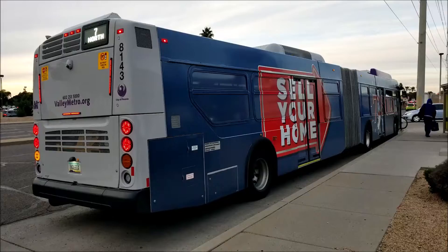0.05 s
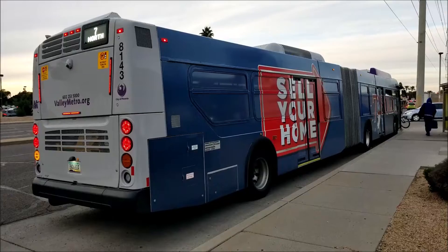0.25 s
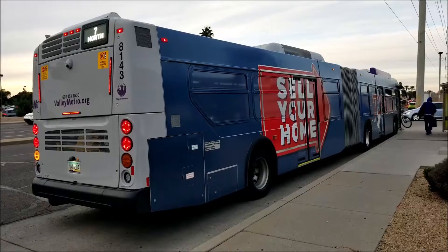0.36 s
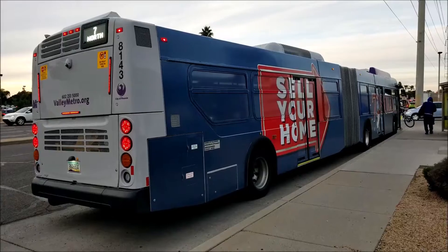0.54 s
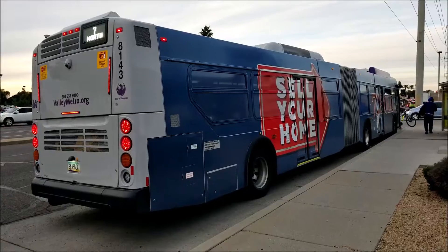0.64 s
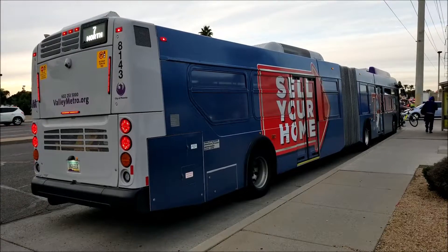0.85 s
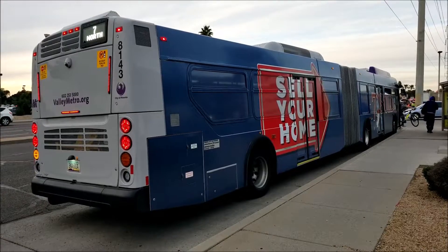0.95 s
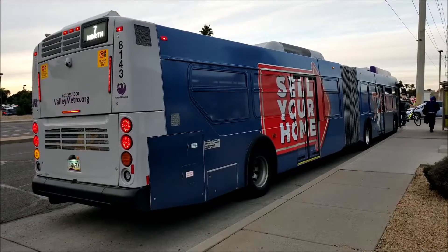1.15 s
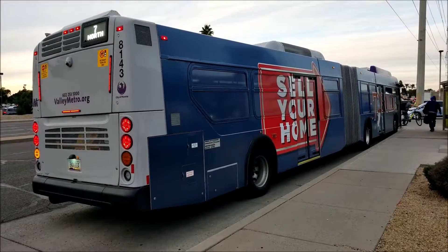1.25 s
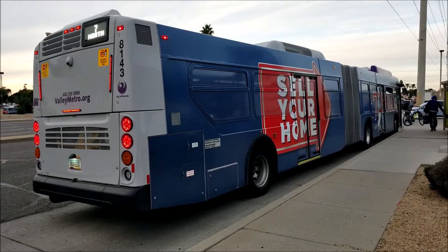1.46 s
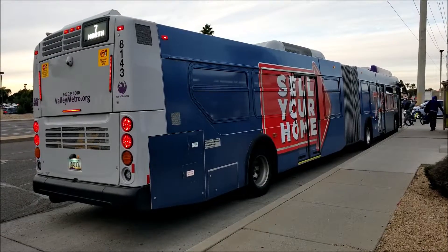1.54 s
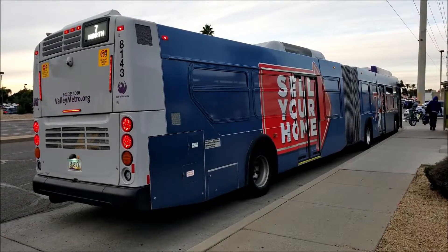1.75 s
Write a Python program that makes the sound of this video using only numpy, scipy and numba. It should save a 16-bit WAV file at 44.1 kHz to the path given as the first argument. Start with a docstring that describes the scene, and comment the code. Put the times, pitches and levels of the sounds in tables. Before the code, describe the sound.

Loud air brake hiss bursts from an idling bus and dies away, with faint traffic behind.

```python
"""A bus's air brake spits once, then lets out its air: a bright, slightly crackling jet
that dies away as the pressure falls. The bus idles at the kerb, heard from behind its
diesel engine, which knocks, hisses and hums, with traffic beyond. The microphone's automatic
volume control turns everything down under the blast and recovers slowly."""
import sys
import numpy as np
from scipy.fft import rfft, irfft
from scipy.io import wavfile
from scipy.ndimage import uniform_filter1d
from numba import njit

SR = 44100
rng = np.random.default_rng(int(sys.argv[2]) if len(sys.argv) > 2 else 0)


def digitize_waveform(pressure):
    """Quantize a signal to 16-bit integers and store it at the path in sys.argv[1].

    Rows of a 2-D input are taken as channels; values are limited to [-1, 1].
    """
    field = np.atleast_2d(pressure).T
    bounded = np.clip(field, -1, 1)
    quanta = np.round(bounded * 32767).astype(np.int16)
    wavfile.write(sys.argv[1], SR, quanta)


N = 79380
FIRING_HZ = 34.82  # cylinder firings each second
TOP_HZ = 15800  # the highest pitch let through


def undb(db):
    """Turn decibels into a number to multiply by."""
    return 10 ** (np.asarray(db) / 20)


def unit(x):
    """Scale a signal to an average strength (rms) of 1."""
    return x / np.sqrt(np.mean(x ** 2))


def clock():
    """The time of each sample, in seconds."""
    return np.arange(N) / SR


def pitches():
    """The pitch of each slot in the spectrum, in Hz."""
    return np.maximum(np.arange(N // 2 + 1) * SR / N, 1)


def colour(points):
    """Join (pitch_hz, level_db) points into a strength for every pitch."""
    hz, db = np.array(points).T
    return undb(np.interp(np.log(pitches()), np.log(hz), db))


def level_curve(points, before=None):
    """Join (time_s, level_db) points into a level in dB for every sample."""
    return np.interp(clock(), *np.array(points).T, left=before)


def resonance(hz, width_hz):
    """How strongly something that rings at hz answers each pitch."""
    return 1 / np.hypot(1, (pitches() ** 2 - hz ** 2) / (pitches() * width_hz))


def filtered(x, gain):
    """Multiply each pitch in a sound by its own gain."""
    return irfft(rfft(x) * gain, N)


def wander(rate_hz):
    """A smooth random wobble of size 1 that moves at about this rate."""
    return unit(filtered(rng.standard_normal(N), 1 / (1 + (pitches() / rate_hz) ** 4)))


def noise(gain, alike_below_hz=1060):
    """Stereo noise of strength 1, shaped by gain: left and right are alike only in the bass."""
    shared, apart = rfft(rng.standard_normal((2, N)))
    alike = .97 / (1 + (pitches() / alike_below_hz) ** 2)
    shared, apart = shared * np.sqrt(1 + alike), apart * np.sqrt(1 - alike)
    return unit(irfft(np.array([shared + apart, shared - apart]) * gain, N))


def tone(hz, db, waver_db=1):
    """A machine tone that wavers a little in loudness and pitch."""
    phase = 2 * np.pi * (hz * clock() + rng.random()) + 0.47 * wander(3)
    return undb(db) * unit(np.sin(phase) * undb(waver_db * wander(11.6)))


# The mix of lows and highs in the exhaust and traffic: pitch_hz, relative_db
STREET_COLOUR = [(20, -27), (40, -3), (56, 4), (85, 1), (130, -2.5), (190, -2), (270, -9.5), (520, -16.5),
                 (1000, -12.5), (2500, -25), (8000, -53)]
def street(level_db=-29):
    """The exhaust and distant traffic rumble, swelling gently."""
    return undb(level_db + 0.27 * wander(9)) * noise(colour(STREET_COLOUR))


# How loud the low drone is as time passes: time_s, level_db
DRONE_LEVELS = [(.12, -54), (.25, -36), (.46, -30.5), (.89, -30.5), (.96, -37.5), (1.08, -28), (1.22, -44)]
def drone():
    """A low drone, probably the cooling fan, swells and sinks."""
    return tone(hz=124.4, db=level_curve(DRONE_LEVELS), waver_db=2.4)


# The tones of the parts turned by the belt: pitch_hz, level_db
BELT_TONES = [(334, -46.5), (597.5, -46.5), (862, -46.5), (894, -53), (947.5, -52.5), (1916, -46)]
def belt_whine():
    """Parts spun by the engine's belt each whine at their own pitch."""
    return sum(tone(hz, db) for hz, db in BELT_TONES)


def belt_squeak(level_db=-59.5, pulse_hz=14):
    """The rubbing belt gives a faint, high, pulsing squeak."""
    rub = unit(1 + np.sin(2 * np.pi * pulse_hz * clock()))
    return undb(level_db) * rub * noise(resonance(hz=10580, width_hz=79) ** 2)


# How loud the exhaust throb is as time passes: time_s, level_db
THROB_LEVELS = [(.13, -61), (.22, -25), (.30, -49), (.365, -23.5), (.45, -49), (.515, -24.5), (.58, -49),
                (.73, -45), (.83, -38), (.93, -31), (1.06, -31.5), (1.4, -34.5), (1.75, -31)]
def exhaust_throb():
    """The exhaust throbs at twice the firing rate."""
    return tone(2 * FIRING_HZ, level_curve(THROB_LEVELS), waver_db=-0.2)


# The engine's steady tones: times_firing_rate, level_db
HUM_TONES = [(1, -55), (3, -41), (4, -46), (10, -49), (12, -47), (20, -52.5), (40, -49)]
def engine_hum():
    """Regular firing makes tones at whole multiples of its rate."""
    return sum(tone(multiple * FIRING_HZ, db) for multiple, db in HUM_TONES)


def firings(first_s=0.004, jitter_s=0.00077, scatter_db=2.54, fade_s=.011):
    """One fading pulse per cylinder firing, each a little uneven in timing and strength."""
    t, pulses = clock(), np.zeros(N)
    for k, (late, strong) in enumerate(rng.standard_normal(size=(70, 2))):
        age = t - first_s - k / FIRING_HZ - jitter_s * late
        pulses += (age > 0) * np.exp(-np.abs(age) / fade_s) * undb(scatter_db * strong)
    return unit(pulses + .6)  # never quite silent between firings


# The mix of pitches in the engine bay's hiss: pitch_hz, relative_db
BAY_COLOUR = [(1000, -10.5), (2600, 11.5), (3300, 2.5), (6000, 3.5), (7300, -7.5), (9500, -8), (13000, -9),
              (16000, -20)]
def bay_hiss(pulses, level_db=-40.5):
    """The engine bay hisses, pulsing softly with each firing."""
    return undb(level_db) * unit(pulses ** .35) * noise(colour(BAY_COLOUR))


# Where the engine block and covers ring: pitch_hz, width_hz (before narrowing), relative_db
BLOCK_RINGS = [(328, 29, 3), (436, 120, -8.5), (720, 71, -4), (933, 310, -1), (1040, 40, -5.5),
               (1610, 176, -3), (1844, 210, -1), (2270, 230, -9.5), (2546, 77, -4)]
def block_clatter(pulses, level_db=-31.5, narrowing=0.91):
    """Each firing knocks the metal engine block and makes it ring."""
    rings = [undb(db) * resonance(hz, narrowing * width) ** 2 for hz, width, db in BLOCK_RINGS]
    block = np.sqrt(sum(ring ** 2 for ring in rings))
    return undb(level_db) * pulses * noise(block)


# The harder diesel knocks: start_s, level_db
KNOCKS = [(.201, -26), (0.29, -27.5), (.408, -24), (0.578, -26.5), (.773, -32), (0.892, -25.5),
          (.923, -27.5), (0.976, -28)]
# The mix of pitches they ring with: pitch_hz, relative_db
KNOCK_COLOUR = [(200, -34), (400, 4.5), (600, -16), (920, 1), (1250, -21), (2000, -10.5), (3500, -20),
                (9000, -45)]
def hard_knocks(fade_s=0.012):
    """Now and then a cylinder knocks harder."""
    t = clock()
    blows = sum(undb(db) * (t > start) * np.exp(-np.abs(t - start) / fade_s) for start, db in KNOCKS)
    return blows * noise(colour(KNOCK_COLOUR))


def engine(right_delay_s=.00005):
    """The idling engine sits a little to the left, so it reaches the right side later."""
    pulses = firings()
    noises = block_clatter(pulses) + bay_hiss(pulses) + belt_squeak() + hard_knocks()
    tones = engine_hum() + exhaust_throb() + belt_whine() + drone()
    left, right = noises + tones
    delay = np.exp(-2j * np.pi * pitches() * right_delay_s)
    return np.array([left, filtered(right, delay)])


# The mix of pitches in the valve's first spit: pitch_hz, relative_db
SPIT_COLOUR = [(1500, -24), (4000, -8.5), (5500, 0), (7300, -9), (9500, -1), (12500, 0.5), (16000, 0)]
def valve_spit(start_s=0.858, rise_s=0.027, hold_s=0.016, fade_s=0.029, level_db=-28):
    """The valve opens for a moment and spits a little air."""
    age = clock() - start_s
    opening = np.clip(age / rise_s, 0, 1)
    closing = np.exp(-np.maximum(age - rise_s - hold_s, 0) / fade_s)
    return undb(level_db) * opening * closing * noise(colour(SPIT_COLOUR))


# The mix of pitches in the roar under the bus: pitch_hz, relative_db
ROAR_COLOUR = [(100, 6), (300, 1), (520, 0), (800, 7.5), (1250, -1.5), (1650, 8), (2800, -5), (5000, 3.5),
               (10000, -21)]
def air_roar(peak_s=1.0865, rise_s=0.032, fade_s=0.098, level_db=-13.5):
    """Air roars under the bus while the flow is strongest."""
    from_peak = clock() - peak_s
    rise = np.exp(-(np.minimum(from_peak, 0) / rise_s) ** 2 / 2)
    fade = np.exp(-np.maximum(from_peak, 0) / fade_s)
    return undb(level_db) * rise * fade * noise(colour(ROAR_COLOUR))


def swirl(hiss, band_hz=506, rate_hz=9.7, depth_db=1.73):
    """Narrow bands of pitch in the hiss swell and sink, each on its own."""
    place = pitches() / band_hz
    bands = (np.maximum(1 - np.abs(place - k), 0) for k in range(int(TOP_HZ / band_hz) + 2))
    return sum(filtered(hiss, band) * undb(depth_db * wander(rate_hz)) for band in bands)


# The mix of pitches in the jet of air: pitch_hz, relative_db
JET_COLOUR = [(200, -19), (700, -14), (1300, -10.5), (1700, -3), (2050, -6.5), (2800, -1), (4300, -2.5),
              (5000, 0), (6000, 0), (7000, -4), (8200, 1.5), (9600, -1), (12000, 3), (14000, 1),
              (15600, -1)]
# How strongly air flows out of the valve: time_s, level_db
AIR_FLOW = [(.953, -47), (.972, -24.5), (1.012, -9.5), (1.05, -6), (1.105, -2), (1.19, -7), (1.31, -9.5),
            (1.455, -9.5), (1.495, -15), (1.65, -21), (1.735, -29), (1.762, -28), (1.795, -47)]
def air_jet(open_s=1.0, fill_s=0.047, flash_s=1.2, closing_s=1.53, dulling_db_per_s=11):
    """Escaping air starts thin and bright, fills out, then turns dull and hollow as the tank empties."""
    t = clock()
    age = np.maximum(t - open_s, 0)
    air = swirl(noise(colour(JET_COLOUR)))
    lows = filtered(air, 1 / (1 + (pitches() / 2670) ** 4))
    mids = filtered(air, resonance(hz=3940, width_hz=1900) ** 2)
    highs = filtered(air, 1 / (1 + (10800 / pitches()) ** 10))
    lows_db = -15 * np.exp(-age / fill_s)  # the lows build up late
    mids_db = -1.5 * np.clip((t - closing_s) / 0.028, 0, 1)  # hollow as the valve closes
    flash_db = np.exp(-((t - flash_s) / 0.019) ** 2)  # the treble briefly flares by 1 dB
    highs_db = flash_db - dulling_db_per_s * age
    for band, db in [(lows, lows_db), (mids, mids_db), (highs, highs_db)]:
        air = air + band * (undb(db) - 1)
    return undb(level_curve(AIR_FLOW, before=-120)) * air


def close_echoes(sound, count=14, spread_s=.012, strength=0.42):
    """Quick echoes off the road and body panels colour the left and right sides differently."""
    sides = []
    for side in sound:
        delays, sizes = rng.random(size=count) * spread_s, rng.standard_normal(size=count)
        echoes = (sizes / np.linalg.norm(sizes)) @ np.exp(-2j * np.pi * np.outer(delays, pitches()))
        sides.append(filtered(side, 1 + strength * echoes))
    return np.array(sides) / np.hypot(1, strength)


def air_brake(crackle_db=1.6, crackle_hz=2450, flutter_db=0.45, flutter_hz=27):
    """The brake lets go of its air, which churns so that it crackles and flutters."""
    spit, roar = valve_spit(), air_roar()
    crackle = np.array([unit(undb(crackle_db * wander(crackle_hz))) for _ in range(2)])
    flutter = undb(flutter_db * wander(flutter_hz))
    return close_echoes((spit + air_jet() + roar) * crackle * flutter)


def scene(start_s=.1225):
    """After a moment of silence: the engine, the street and the air brake together."""
    return (engine() + street() + air_brake()) * (clock() > start_s)


@njit
def follow(power, rise_s, fall_s):
    """Keep track of a sound's power, with one speed for rising and another for falling."""
    out, level = np.empty(len(power)), 0.
    for i in range(len(power)):
        level += (power[i] - level) / (SR * (rise_s if power[i] > level else fall_s))
        out[i] = level
    return out


def volume_control(x, threshold_db=-19, ratio=3.29):
    """Turn the sound down quickly when it gets loud, and back up slowly."""
    power = uniform_filter1d(np.mean(x ** 2, axis=0), size=256)
    loudness = np.sqrt(np.abs(follow(power, rise_s=0.05, fall_s=3.1)))
    excess = np.maximum(loudness / undb(threshold_db), 1)
    return x * excess ** (1 / ratio - 1)


# How the microphone's two openings favour different pitches: pitch_hz, left_minus_right_db
MIC_BALANCE = [(100, 0), (400, -1.5), (800, -1.9), (2000, -3.5), (2700, -1.5), (3400, 4.5), (4300, 5),
               (6200, 9.5), (7400, 5), (8400, -1), (9700, -4.5), (11200, -6), (13000, 6), (15500, -4)]
def record(dry):
    """The microphone colours each side, evens out the volume and cuts the highest treble."""
    tilt = np.sqrt(colour(MIC_BALANCE))
    x = filtered(dry, unit(np.array([tilt, 1 / tilt])))
    x = volume_control(x)
    x = x / (1 + x ** 4) ** .25  # round off the tallest peaks
    return filtered(x, 1 / np.hypot(1, (pitches() / TOP_HZ) ** 200))


dry = scene()
out = record(dry)
digitize_waveform(out)
```